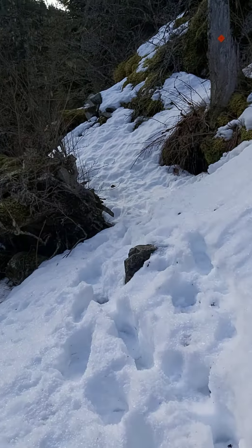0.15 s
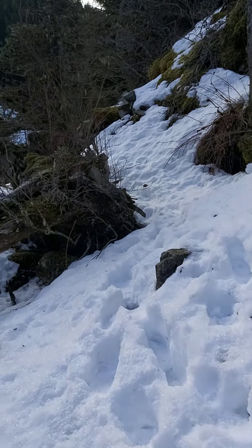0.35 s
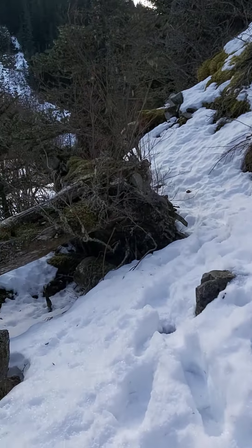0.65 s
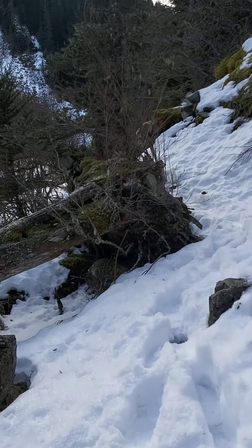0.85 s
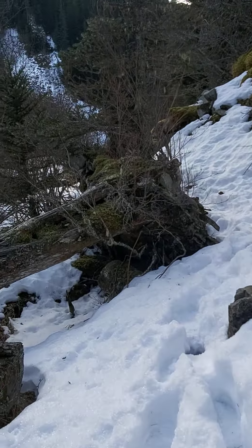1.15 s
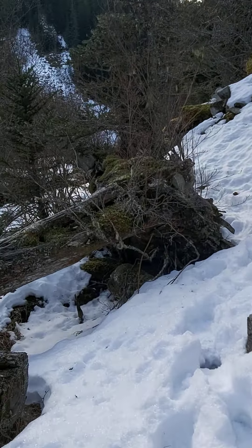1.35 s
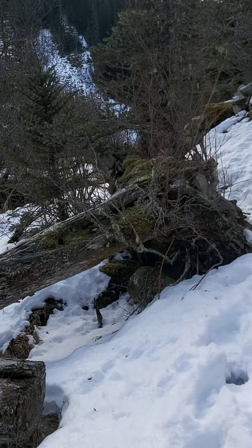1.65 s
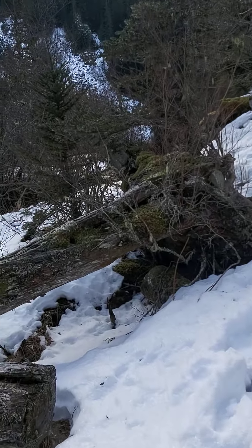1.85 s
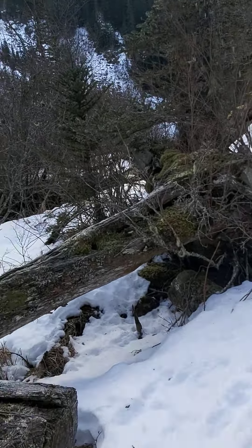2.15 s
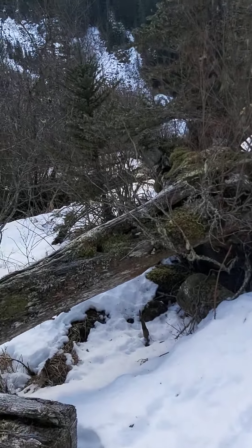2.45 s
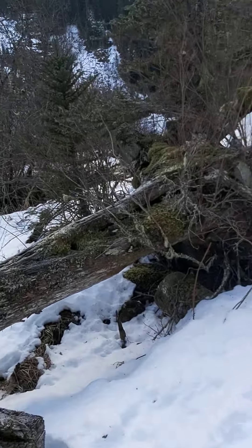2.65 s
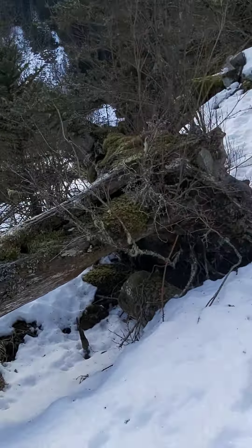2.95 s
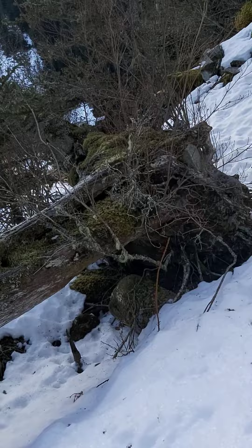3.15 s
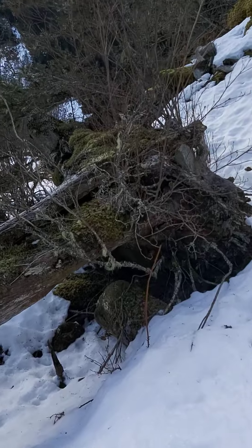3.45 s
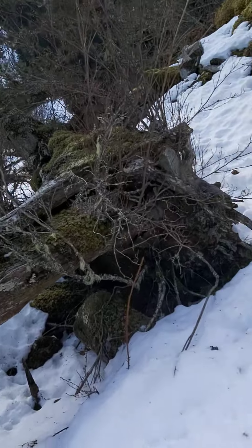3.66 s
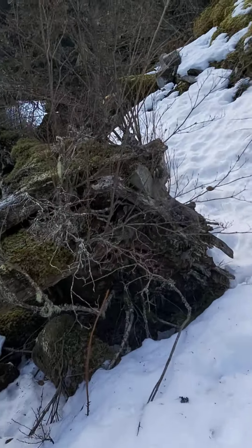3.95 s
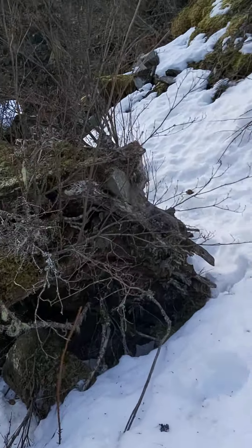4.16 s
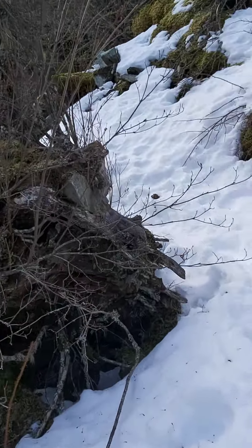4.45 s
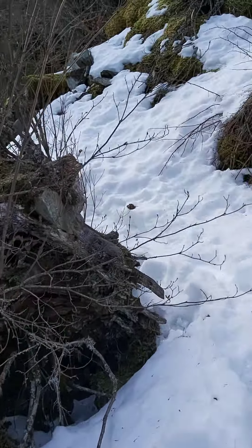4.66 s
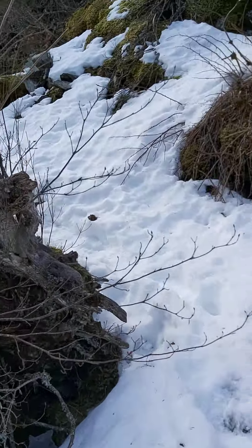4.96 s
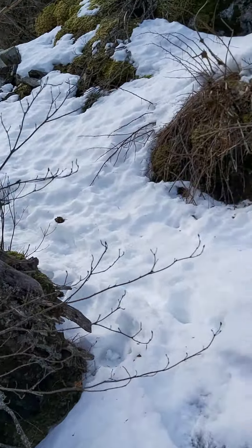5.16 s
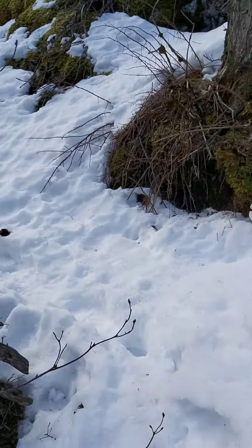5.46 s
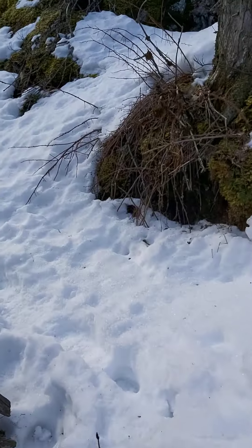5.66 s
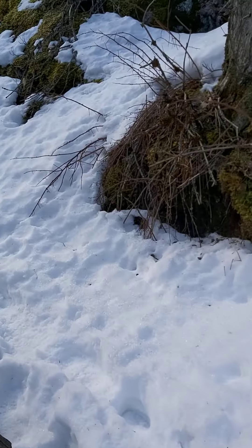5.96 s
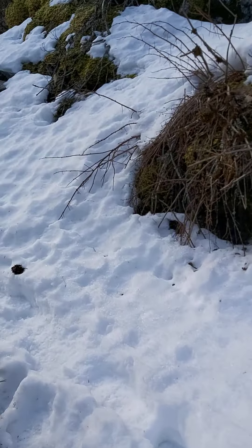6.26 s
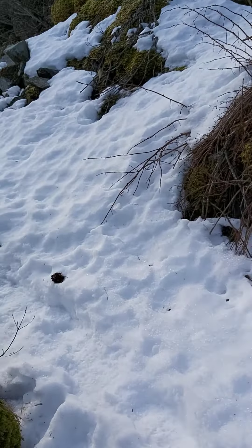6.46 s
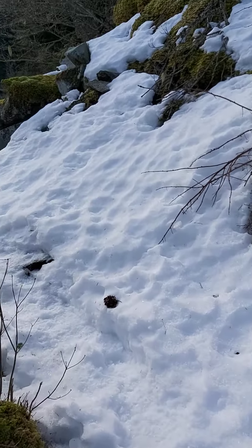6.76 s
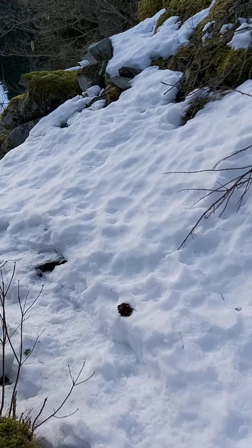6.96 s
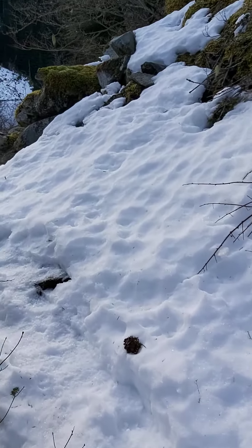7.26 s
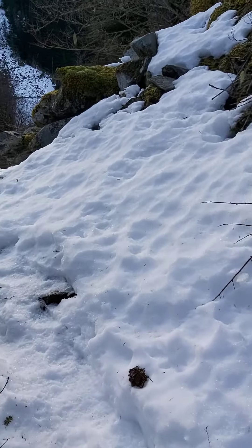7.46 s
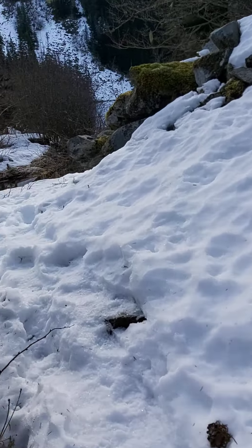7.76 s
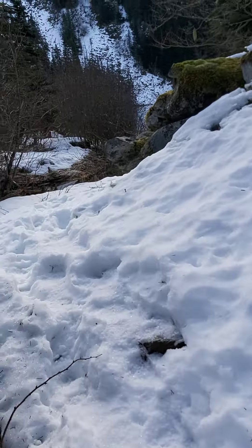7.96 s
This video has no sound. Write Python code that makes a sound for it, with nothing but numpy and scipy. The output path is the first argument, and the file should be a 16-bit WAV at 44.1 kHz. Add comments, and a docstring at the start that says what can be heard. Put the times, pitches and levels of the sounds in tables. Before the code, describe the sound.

Boots walk at a steady pace over hard, crusty snow, each step crunching, creaking and spraying fine ice above a faint outdoor hush.

```python
"""Boots on crusted snow

On a trail of hard, crusty snow, boots walk just below a hand-held microphone with two ports.
Each step packs the snow with dull creaks, breaks the crust and sprays fine ice, all as streams of tiny
noise bursts; slabs crack, thin ice ticks and stabs rasp through the crust as single or dense fractures.
A bit of metal gear clinks in ringing modes. Behind lie a coloured-noise hush, a low drone and puffs of air."""
import sys
import numpy as np
from scipy import signal
from scipy.io import wavfile
from scipy.ndimage import uniform_filter1d

SR = 44100
rng = np.random.default_rng(int(sys.argv[2]) if len(sys.argv) > 2 else 0)


def digitize_waveform(pressure):
    """Quantize a signal to 16-bit integers and store it at the path in sys.argv[1].

    Rows of a 2-D input are taken as channels; values are limited to [-1, 1].
    """
    field = np.atleast_2d(pressure).T
    bounded = np.clip(field, -1, 1)
    quanta = np.round(bounded * 32767).astype(np.int16)
    wavfile.write(sys.argv[1], SR, quanta)


N = 357651
TIME = np.arange(N) / SR
# coarse times at which the slow gains of the boots are drawn
MOMENTS = TIME[::40]


def amp(db):
    """Turns decibels into an amplitude factor."""
    return 10 ** (np.asarray(db) / 20)


def read(points, hz):
    """Reads a spectrum along a logarithmic frequency axis."""
    f, value = np.transpose(points)
    return np.interp(np.log(hz + 1), np.log(f + 1), value)


def add(mix, s, sound):
    """Lays a short stereo sound into the mix from time s."""
    part = mix[:, max(round(s * SR), 0):][:, :sound.shape[1]]
    part += sound[:, :part.shape[1]]


def evened(pair):
    """Scales a stereo pair so that its centre has rms 1."""
    return pair / np.sqrt(np.mean(pair.mean(0) ** 2) + 1e-20)


# how much weaker the left port hears: (frequency [Hz], left minus right [dB])
BALANCE = [(60, -12.5), (300, -5.5), (1300, -8.5), (4000, -7.5), (7000, -4), (10000, -18.5), (16000, -8.5)]
LAG = 24  # samples by which the left port hears the boots later


def colour(pair, spectrum, likeness, lag=LAG, size=2048):
    """Gives two unrelated signals a causal colour, and the likeness, delay and balance of the two ports."""
    hz = abs(np.fft.fftfreq(size, 1 / SR))
    right_db = read(spectrum, hz)
    log_gain = np.log(amp([right_db + read(BALANCE, hz), right_db]))
    # minimum phase: the energy comes as early as the colour allows
    taps = np.fft.ifft(np.exp(np.conj(signal.hilbert(log_gain)))).real
    same = np.clip(likeness, 0, 1)
    left = same * pair[1] + np.sqrt(1 - same ** 2) * pair[0]
    left = np.pad(left, (lag, 0))[:pair.shape[1]]
    return signal.oaconvolve(np.array([left, pair[1]]), taps, axes=1)[:, :pair.shape[1]]


def fracture(spectrum, decay_s, likeness, lag=LAG, spike=0, size=2048):
    """One break in the snow: a first spike and a tiny dying burst with its own chance colour, of energy 1."""
    burst = rng.standard_normal((2, size)) * np.exp(-np.arange(size) / SR / decay_s)
    burst[1, 0] += spike * np.linalg.norm(burst[1])
    return evened(colour(burst, spectrum, likeness, lag)) / np.sqrt(size)


def scatter(clicks, kind, kinds):
    """Sets off the fracture of its kind at every click."""
    out = np.zeros((2, len(clicks)))
    for k, sound in enumerate(kinds):
        own_clicks = (clicks * (kind == k))[None]
        out += signal.oaconvolve(own_clicks, sound, axes=1)[:, :len(clicks)]
    return out


def grains(spectrum, per_s, spread_db, clump_db, clump_s, decay_s, likeness, lag=LAG, size=N, count=14):
    """A stream of fractures of uneven size that come in clumps, evened to a nearly steady power."""
    knots = np.cumsum(rng.uniform(.3, 1.7, 6000)) * clump_s
    clumps = np.interp(TIME[:size], knots, np.clip(rng.standard_normal(len(knots)), -2, 2))
    heights = amp(spread_db * np.minimum(rng.exponential(1, size), 4) + clump_db * clumps)
    clicks = heights * rng.choice([-1, 1], size) * (rng.random(size) < per_s / SR)
    # each patch of crust breaks with a couple of colours of its own
    patch = np.cumsum((rng.random(size) < 45 / SR) * rng.integers(1, count, size))
    kind = (patch + rng.integers(0, 2, size)) % count
    out = scatter(clicks, kind, [fracture(spectrum, decay_s, likeness, lag) for _ in range(count)])
    # the boot sinks steadily, so the grains share out a steady supply of energy
    power = uniform_filter1d(out.mean(0) ** 2, size=2200)
    return out / np.sqrt(abs(power) + 0.041 * power.mean())


# colour of the valley's hush: (frequency [Hz], relative level [dB])
HUSH = [(20, -26), (60, -5), (120, 7.5), (220, -8.5), (320, 15), (430, 10), (650, -13), (1000, -3),
        (1500, 2.5), (3000, -5.5), (6000, -6.5), (8000, -6.5), (12000, -9), (16000, 1)]
HUSH_DB = -56.5  # rms of the two ports' mean


def hush():
    """The steady hush of the valley: coloured noise, partly alike at the two ports."""
    noise = colour(rng.standard_normal((2, N)), HUSH, likeness=0.42, lag=0)
    return amp(HUSH_DB) * evened(noise)


# a low drone swells and sinks: (time [s], level midway between the ports [dB])
DRONE = [(0, -62.5), (2.2, -85), (3.3, -75), (4.3, -57.5), (5.2, -67), (5.8, -74), (8.1, -69)]
DRONE_HZ = 65  # middle pitch


def drone():
    """A faint sine whose pitch drifts a little, stronger at the right port."""
    drift = np.interp(TIME, np.linspace(0, TIME[-1], num=40), rng.standard_normal(40))
    cycles = np.cumsum(DRONE_HZ + 1.58 * drift) / SR
    level = amp(np.interp(TIME, *np.transpose(DRONE)))
    return level * np.sin(2 * np.pi * cycles) * amp([[-3], [3]])


# puffs of air on the microphone: (time [s], length [s], relative level [dB])
PUFFS = [(2.403, 0.25, -45), (6.51, 0.048, -45), (6.66, 0.066, -52)]
# their colour: (frequency [Hz], relative level [dB])
PUFF = [(20, -24), (50, 6), (100, -3.5), (170, -9.5), (500, -35)]


def puffs():
    """Low noise swells and sinks as air pushes on the microphone."""
    gust = sum(amp(db) * np.sin(np.pi * np.clip((TIME - s) / length, 0, 1)) for s, length, db in PUFFS)
    noise = evened(colour(rng.standard_normal((2, N)), PUFF, likeness=.4))
    return gust * noise * amp([[-6], [1]])


# clinks of metal gear: (time [s], relative level [dB])
CLINKS = [(4.236, -8.5), (4.248, -34), (4.707, -10)]
# modes of the metal: (frequency [Hz], relative level [dB], time to fall 60 dB [s])
METAL = [(1390, -12.5, 0.029), (3970, -11, 0.028), (8330, -4.5, 0.076), (9300, -17, 0.034)]
# colour of the tap that sets it ringing: (frequency [Hz], relative level [dB])
TAP = [(700, -33), (1600, -4.5), (6200, -2.5), (10500, -3), (16000, 2)]


def clinks():
    """A sharp tap rings a small metal part in a few dying modes."""
    out, t = np.zeros((2, N)), TIME[:SR // 8]
    for s, db in CLINKS:
        ring = np.zeros((2, len(t)))
        for hz, level, t60 in METAL:
            ring += amp(level - 60 * t / t60) * np.sin(2 * np.pi * (hz * t + rng.random((2, 1))))
        add(out, s, amp(db - 5) * ring)
        tap = fracture(TAP, decay_s=0.0018, likeness=0.4, lag=0)
        add(out, s, amp(db + 12.5) * tap * amp([[5], [-3]]))
    return out


# stabs through the crust:
# (time [s], rise constant [s], length [s], relative level [dB], fading over the length [dB])
STABS = [(2.498, 0.00045, 0.002, -25.5, -0.5), (4.097, 0.002, 0.0087, -15, 4),
         (4.11, 0.00038, 0.019, -16, 14), (5.152, 0.00083, 0.043, -18, 5),
         (5.454, 0.00083, 0.018, -23, 3.5), (5.911, 0.00091, 0.019, -21, -2.5),
         (5.924, 0.005, 0.048, -18.5, 14), (7.728, 0.00052, 0.018, -21, 0.5)]
# their colour: (frequency [Hz], relative level [dB])
RASP = [(100, -26), (300, -14), (800, -15), (1400, -5), (2400, -4), (4200, -2), (5100, -7), (5900, -12.5),
        (9000, -20), (11500, -15.5), (16000, -15.5)]


def stabs():
    """A dense rasp of breaking crust straight ahead, reaching both ports together."""
    out, t = np.zeros((2, N)), TIME[:SR // 8] - .01
    for s, rise, length, db, fade_db in STABS:
        # the surface gives a little before it breaks
        onset = np.minimum(t / rise - 2, 0)
        release = np.maximum(t - length, 0) / 0.0043
        push = np.exp(onset - release) * amp(-fade_db * t / length)
        rasp = grains(RASP, per_s=3000, spread_db=3, clump_db=1.4, clump_s=.002, decay_s=.0011,
                      likeness=.55, lag=0, size=len(t))
        add(out, s + t[0], amp(db) * push * rasp * amp([[1], [-.5]]))
    return out


# brittle ice snapping: (time [s], relative level [dB])
SNAPS = [(1.307, -15), (1.409, -13.5), (1.4415, -14.5), (1.535, -7), (1.577, -18), (1.588, -7.5),
         (1.591, -7), (1.603, -18), (1.662, -13), (1.734, -19), (1.984, -19), (2.392, -32.5),
         (2.6945, -5.5), (2.7559, -7.5), (3.005, -28), (3.01, -27), (3.082, -30), (3.268, -22),
         (3.6098, -13.5), (3.853, -29.5), (4.103, -17)]
# colour of snaps, and of the crumbs under the boots: (frequency [Hz], relative level [dB])
SNAP = [(300, -7.5), (1500, -1), (4000, -0.5), (6500, 3.5), (8000, -6.5), (12000, 7), (16000, 1)]


def snaps():
    """Thin ice breaks with a bright tick."""
    out = np.zeros((2, N))
    for s, db in SNAPS:
        add(out, s, amp(db + 8) * fracture(SNAP, decay_s=0.0011, likeness=0.078, spike=0.17))
    return out


# slabs of crust giving way: (time [s], relative crack level [dB], relative thud level [dB])
POPS = [(0.0713, -21.5, -39.5), (0.174, -22, -33), (0.2813, -19, -53), (0.3578, -26.5, -37.5),
        (0.497, -39, -48.5), (0.5706, -37, -50), (1.393, -37, -31), (1.501, -40, -31.5),
        (1.6453, -19.5, -29), (1.8001, -21.5, -34), (1.9478, -28, -28.5), (2.0175, -28, -34),
        (2.089, -29, -53), (2.148, -27.5, -38.5), (2.501, -16.5, -71), (2.604, -18, -60), (2.808, -23, -49),
        (3.0478, -23, -40), (3.2126, -26, -38.5), (3.2675, -38, -35), (3.5426, -20, -62),
        (3.9559, -30, -35), (5.0396, -38, -25), (5.2284, -22, -33.5), (5.2627, -18, -36), (5.31, -21, -43),
        (5.6185, -25, -40), (5.743, -31, -33), (5.7874, -32.5, -43), (6.077, -23, -31),
        (6.1103, -14, -27.5), (6.1353, -21, -28.5), (6.3829, -31, -38), (6.4783, -28, -66),
        (6.5277, -23.5, -33.5), (6.5787, -23.5, -36), (6.6508, -22.5, -36), (6.676, -20.5, -41),
        (6.8088, -16, -39), (6.8364, -47, -32), (6.886, -26.5, -36), (6.9331, -24, -30.5),
        (7.3795, -31, -30.5), (7.401, -31, -29.5), (7.456, -24, -30.5), (7.4967, -35, -36),
        (7.528, -30.5, -37), (7.5684, -24.5, -35), (7.7005, -20, -38), (7.9752, -26, -35.5)]
# colours of packed, creaking and crushed snow, also under the steps:
# (frequency [Hz], relative level [dB])
PACK = [(25, -65), (60, -23), (150, -8.5), (230, -5.5), (295, 4), (400, -1), (560, -3), (800, -6),
        (1200, -15.5), (2500, -33)]
CREAK = [(200, -41), (600, -9), (900, -0.5), (1350, 4.5), (1900, -2.5), (2500, -11), (4000, -28),
         (9000, -49)]
CRUNCH = [(600, -21), (1800, 0), (2700, 3), (3800, 1), (5000, -3), (6700, -1.5), (7300, -15.5),
          (9000, -14.5), (14000, -19)]


def pops():
    """A slab cracks with a hollow knock, together with a dull thud of the packed snow."""
    out = np.zeros((2, N))
    for s, crack_db, thud_db in POPS:
        # each knock has its own chance pitch
        knock = np.array(CREAK) * [rng.uniform(0.81, 1.45), 1]
        crack = amp(14.5) * fracture(knock, decay_s=0.0048, likeness=0.64, spike=0.63)
        crack += amp(1.0) * fracture(CRUNCH, decay_s=0.0032, likeness=0.31, spike=0.39)
        thud = fracture(PACK, decay_s=0.0062, likeness=1.0, spike=0.71)
        add(out, s + 0.000707, amp(crack_db) * crack)
        add(out, s, amp(thud_db + 24.0) * thud)
    return out


def stroke(s, attack, hold, db_per_s):
    """A gain that climbs 20 dB during the attack, holds from time s, then fades."""
    rise_db = -20 * np.maximum(s - MOMENTS, 0) / attack
    return amp(rise_db - db_per_s * np.maximum(MOMENTS - s - hold, 0))


# a boot scuffs over the crust: (time [s], swell by 20 dB [s], hold [s], fall by 20 dB [s],
# relative crunching [dB], relative ice spray [dB])
SCUFFS = [(0, .05, 0, 0.16, -48, -51), (0.093, .015, 0.035, 0.05, -49, -35),
          (0.859, 0.037, 0.0037, 0.062, -28, -32.5), (1.056, 0.072, 0.0098, 0.15, -33, -35.5),
          (1.235, 0.078, 0, 0.12, -38.5, -35), (1.307, .03, 0.0015, 0.19, -37.5, -35.5),
          (1.4, 0.14, 0, 0.1, -40, -40), (1.5, 0.057, 0, 0.073, -42.5, -40.5),
          (1.601, 0.086, .05, 0.13, -40.5, -40), (1.751, .02, 0, 0.021, -34.5, -31),
          (2.02, 0.013, 0, 0.11, -41, -41), (2.33, 0.017, 0, 0.062, -50, -62),
          (2.59, 0.012, 0.041, 0.13, -38, -31.5), (2.679, 0.033, 0.01, 0.056, -25.5, -31),
          (2.742, 0.026, 0.03, 0.058, -32, -40), (2.808, .01, 0.03, 0.028, -34, -39),
          (2.9, 0.068, 0.0086, 0.055, -44.5, -44), (2.987, 0.15, 0.11, 0.19, -48, -60),
          (3.268, 0.16, 0.065, .05, -40.5, -50), (3.32, 0.022, 0.064, 0.02, -36.5, -36),
          (3.484, 0.067, 0.064, 0.028, -46, -47), (3.643, 0.088, 0.085, .3, -60, -55),
          (4.045, 0.018, 0.0012, .03, -34.5, -26), (4.21, 0.037, 0, 0.065, -46, -40),
          (4.268, 0.055, 0.086, 0.1, -42.5, -44.5), (4.416, 0.054, 0.0038, .04, -45.5, -62),
          (4.509, 0.061, 0.023, 0.16, -43.5, -44.5), (4.645, .08, 0.066, 0.15, -50.5, -63),
          (4.909, 0.035, 0, 0.15, -48, -50), (5.037, 0.066, 0.0094, 0.087, -31, -34.5),
          (5.133, 0.047, 0.046, 0.064, -25.5, -29), (5.404, 0.038, 0.052, 0.067, -38, -45.5),
          (5.578, 0.039, .02, 0.25, -49, -50.5), (6.146, 0.025, 0.068, 0.026, -30.5, -34.5),
          (6.355, 0.0082, 0, 0.0099, -34.5, -36), (6.598, 0.046, .025, 0.053, -41, -42),
          (6.75, 0.35, 0.21, .1, -53, -55.5), (6.948, 0.039, 0.016, 0.045, -33.5, -41),
          (7.088, 0.076, 0.032, 0.017, -37.5, -43), (7.15, 0.034, 0.061, 0.069, -58, -61),
          (7.42, 0.045, 0.016, 0.089, -46.5, -48), (7.666, .025, 0.016, 0.033, -31.5, -28),
          (7.789, .02, 0.038, .05, -36, -34)]
# a scuff presses lightly and creaks a little, relative to its crunch
SCUFF_PACK_DB, SCUFF_CREAK_DB = -13.5, -3.5


def scuffs():
    """Power of packing, creaking, crunching and spray as the boot slides over the crust."""
    power = np.zeros((4, len(MOMENTS)))
    for s, swell, hold, dying, crunch_db, spray_db in SCUFFS:
        levels = [crunch_db + SCUFF_PACK_DB, crunch_db + SCUFF_CREAK_DB, crunch_db, spray_db]
        power += np.outer(amp(levels) ** 2, stroke(s, swell, hold, 20 / dying) ** 2)
    return power


# the sole sinks into the soft snow under the crust:
# (time of deepest push [s], length [s], relative packing [dB], relative creaking [dB])
SINKS = [(.2, 0.14, -34, -37), (0.38, .05, -45, -46.5), (0.49, 0.1, -56.5, -58), (0.899, 0.07, -35, -52),
         (1.023, 0.026, -41.5, -50), (1.114, 0.094, -43, -57), (1.397, 0.3, -46.5, -60),
         (1.759, 0.022, -28, -50), (1.917, 0.094, -38, -43), (2.056, 0.084, -44, -43.5),
         (2.238, .03, -57, -49), (2.635, .11, -34, -34.5), (2.899, 0.056, -42, -43.5),
         (3.35, 0.035, -28, -44), (3.782, 0.12, -54, -67), (4.134, 0.019, -38, -57),
         (4.211, 0.021, -35.5, -43), (4.304, 0.11, -37.5, -45.5), (4.541, 0.069, -42.5, -46),
         (5.06, 0.035, -33, -59), (5.328, 0.025, -35, -39), (5.644, 0.14, -42.5, -42.5),
         (6.093, 0.021, -35, -34), (6.265, 0.037, -53, -32.5), (6.86, .16, -48.5, -45.5),
         (7.092, 0.044, -28.5, -37), (7.164, 0.014, -42.5, -52), (7.3, 0.026, -46, -49),
         (7.476, 0.13, -48.5, -65), (7.808, 0.027, -24, -24.5), (7.901, 0.031, -30, -37.5),
         (8.1, 0.016, -45, -50)]


def sinks():
    """Power of packing and creaking as the sole sinks; nothing is crunched or sprayed."""
    power = np.zeros((4, len(MOMENTS)))
    for s, length, pack_db, creak_db in SINKS:
        push = np.exp(-(2 * (MOMENTS - s) / length) ** 2)
        power[:2] += np.outer(amp([pack_db, creak_db]) ** 2, push)
    return power


# footfalls: (time fully down [s], attack [s], hold [s], fading [dB per s], relative packing [dB],
# relative crunching [dB], relative ice spray [dB], settling crumbs against the step [dB])
STEPS = [(0.092, .025, 0.19, 87, -65, -44.5, -45, -37), (0.83, 0.019, 0.051, 257, -35.5, -42.5, -40, -16),
         (1.741, 0.081, 0.097, 90, -39.5, -38.5, -35.5, -15),
         (2.528, 0.027, 0.11, 110, -37.5, -39.5, -38, -15),
         (3.332, .025, 0.15, 88, -44.5, -42.5, -43.5, -17),
         (4.041, 0.035, 0.081, 215, -33, -39.5, -37.5, -30),
         (5.044, 0.041, 0.28, 208, -41, -39, -39, -20.5), (6.072, 0.017, 0.22, 173, -40.5, -39.5, -45, -15),
         (6.938, 0.055, 0.17, 596, -40.5, -42, -41, -18.5), (7.668, 0.17, 0.2, 65, -41.5, -45.5, -43, -6)]
# a footfall creaks near the midpoint of its packing and its crunch
STEP_CREAK_DB = -0.5
# loose crumbs keep settling after each footfall
SETTLE_DB_PER_S = 9


def footfalls():
    """Power of packing, creaking, crunching and spray as the weight comes down and crumbs settle."""
    power = np.zeros((4, len(MOMENTS)))
    for s, attack, hold, fading, pack_db, crunch_db, spray_db, settle_db in STEPS:
        settling = amp(settle_db) * stroke(s, attack, hold, SETTLE_DB_PER_S)
        weight = stroke(s, attack, hold, fading) ** 2 + settling ** 2
        levels = [pack_db, (pack_db + crunch_db) / 2 + STEP_CREAK_DB, crunch_db, spray_db]
        power += np.outer(amp(levels) ** 2, weight)
    return power


def tread():
    """How hard the snow is packed, creaks, is crushed and sprays: the boots' movements add in power."""
    power = footfalls() + sinks() + scuffs()
    return [np.interp(TIME, MOMENTS, np.sqrt(p)) for p in power]


def avalanches(per_s, spread_db, decay_s, steady):
    """The crust fails in jolts that start at once and die away; a gain with a local rms near 1."""
    jolts = (rng.random(N) < per_s / SR) * amp(spread_db * np.minimum(rng.exponential(1, N), 3))
    power = signal.lfilter([1], [1, -np.exp(-1 / SR / decay_s)], jolts ** 2)
    power += steady * power.mean()
    return np.sqrt(power / uniform_filter1d(power, size=2200))


# single icy crumbs tick above the crunch; they stand out most when the boot is light,
# because they follow the crunch by a power below 1
CRUMBS_PER_S, CRUMB_DB, CRUMB_SPREAD_DB, CRUMB_FOLLOWS = 50, -5, 6, 0.69


def crumbs(crunch, count=8):
    """Separate little ticks of ice, thrown up by the crunching."""
    spread = CRUMB_SPREAD_DB * np.minimum(rng.exponential(1, N), 3)
    heights = amp(CRUMB_DB + spread) * crunch ** CRUMB_FOLLOWS
    clicks = heights * (rng.random(N) < CRUMBS_PER_S / SR)
    kinds = [fracture(SNAP, decay_s=0.0017, likeness=0.27, spike=0.38) for _ in range(count)]
    return scatter(clicks, rng.integers(0, count, N), kinds)


# colour of the sprayed ice: (frequency [Hz], relative level [dB])
SPRAY = [(3000, -15), (7600, -10), (8600, -10), (10500, -2), (12500, 3), (15800, -1)]


def steps():
    """The boots pack deep snow, make it creak, crush the crust and spray ice, all in the same jolts."""
    pack, creak, crunch, spray = tread()
    # a light boot breaks single crumbs; a hard, sliding one breaks so many that they merge
    merged = (crunch / amp(-46.5)) ** 0.85
    jolt = avalanches(per_s=110, spread_db=4.5, decay_s=0.0023, steady=0.52 + merged)
    body = amp(0.5) * pack * grains(PACK, per_s=700, spread_db=1.0, clump_db=1.5, clump_s=0.011,
                                    decay_s=0.00055, likeness=0.95)
    body += amp(-0.5) * creak * grains(CREAK, per_s=700, spread_db=1.0, clump_db=0.5, clump_s=0.013,
                                       decay_s=0.00047, likeness=0.67)
    body += amp(1) * crunch * grains(CRUNCH, per_s=3500, spread_db=3.0, clump_db=1.5, clump_s=0.0039,
                                     decay_s=0.0013, likeness=0.044)
    fine = amp(2) * spray * grains(SPRAY, per_s=6000, spread_db=2.5, clump_db=2, clump_s=0.0069,
                                   decay_s=0.00072, likeness=0.1)
    return body * jolt + fine * jolt ** 1.02 + crumbs(crunch)


def scene():
    """The valley's air behind, the gear and the breaking crust nearer, the boots right below."""
    background = hush() + drone() + puffs()
    return background + clinks() + stabs() + snaps() + pops() + steps()


def record(dry):
    """The recorder's steep band limit: a low-pass at 16050 Hz."""
    taps = signal.firwin(511, 16050, window=("kaiser", 9), fs=SR)
    return signal.oaconvolve(dry, taps[None], "same")


dry = scene()
out = record(dry)
digitize_waveform(out)
```